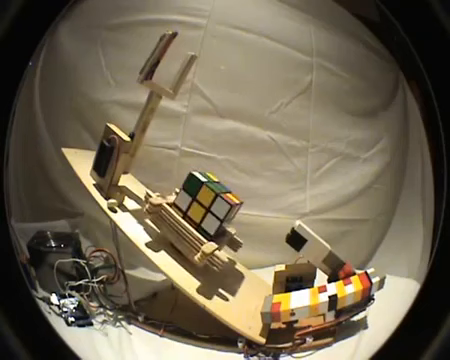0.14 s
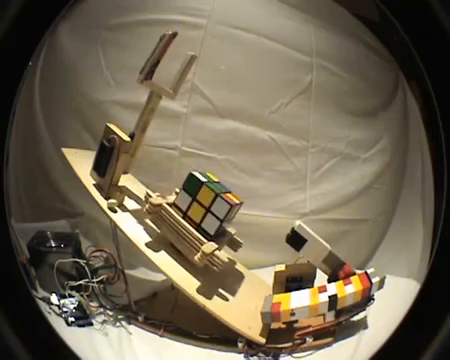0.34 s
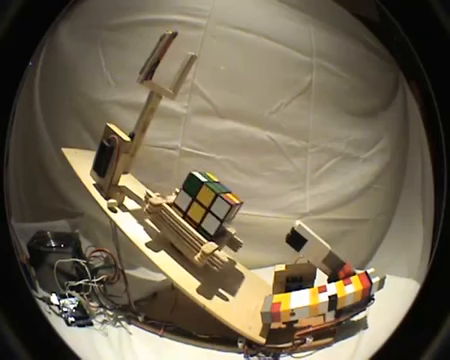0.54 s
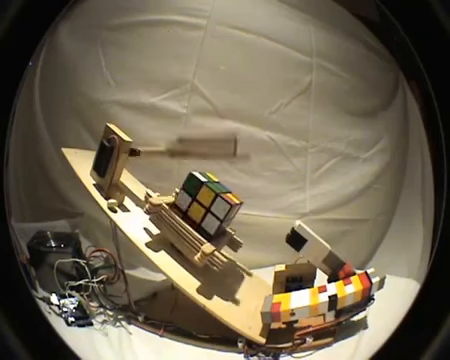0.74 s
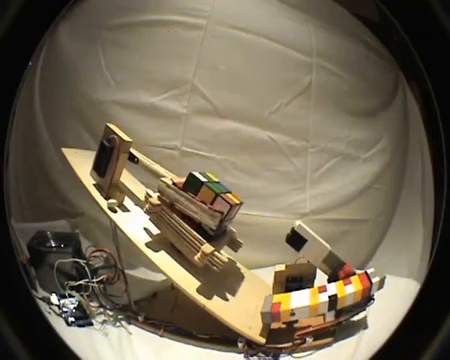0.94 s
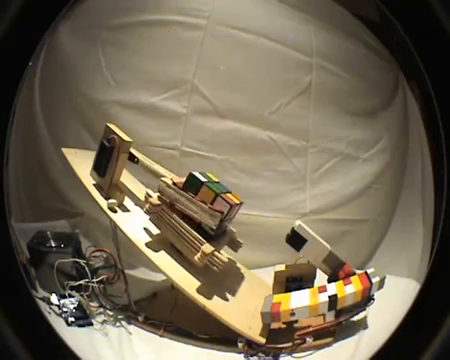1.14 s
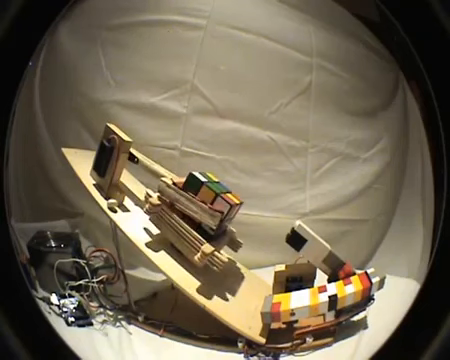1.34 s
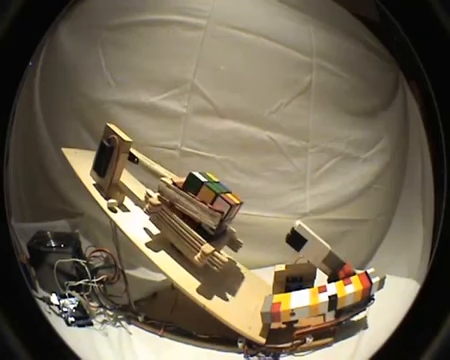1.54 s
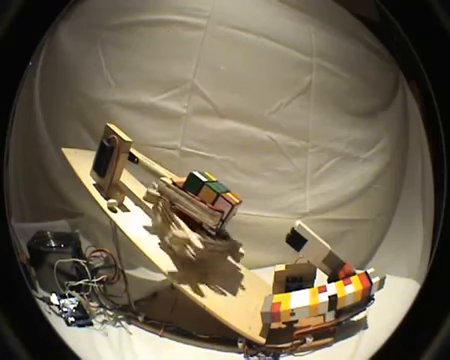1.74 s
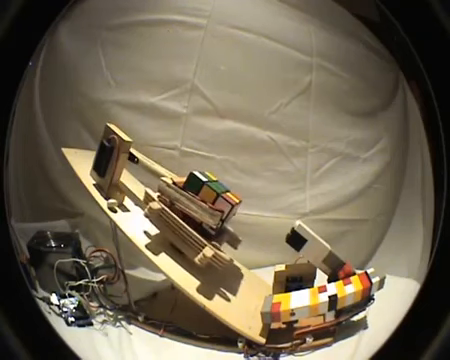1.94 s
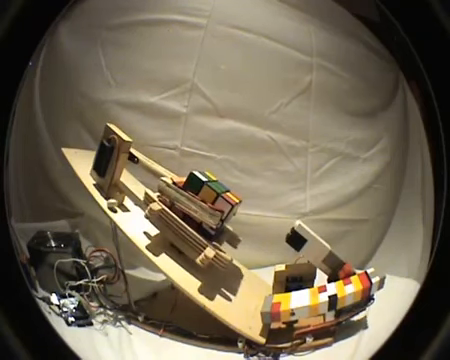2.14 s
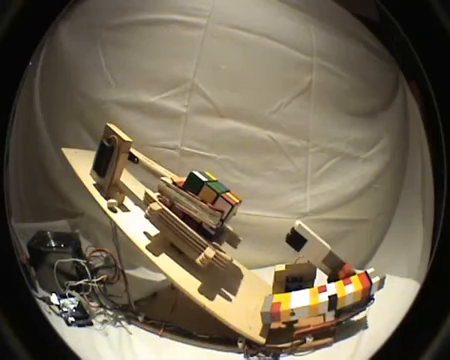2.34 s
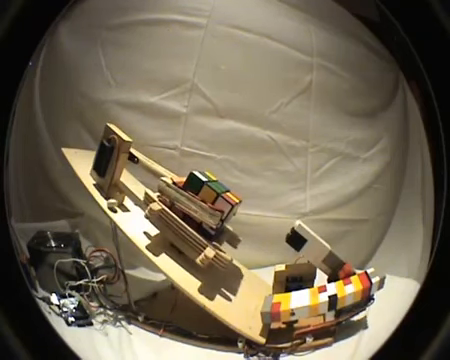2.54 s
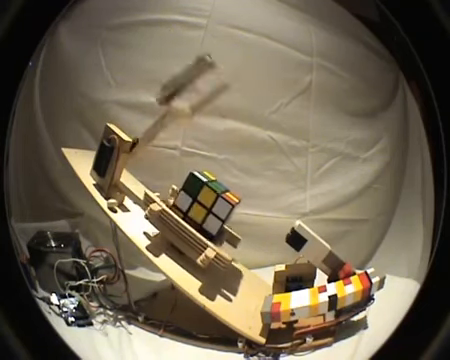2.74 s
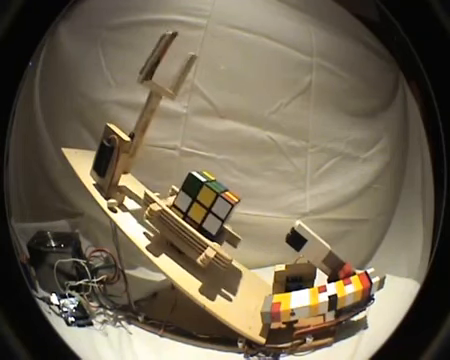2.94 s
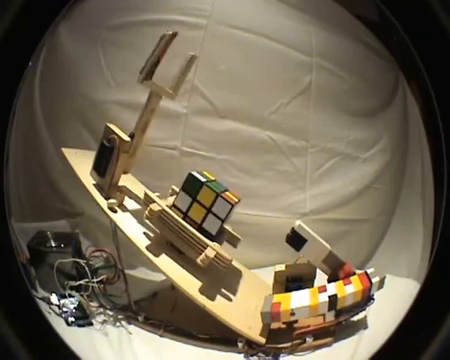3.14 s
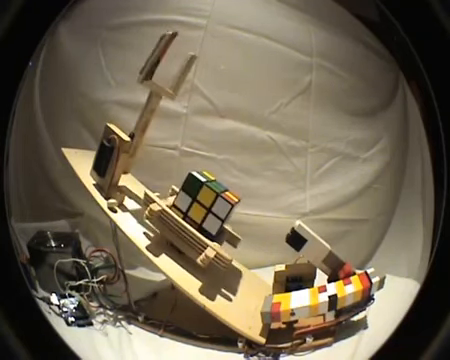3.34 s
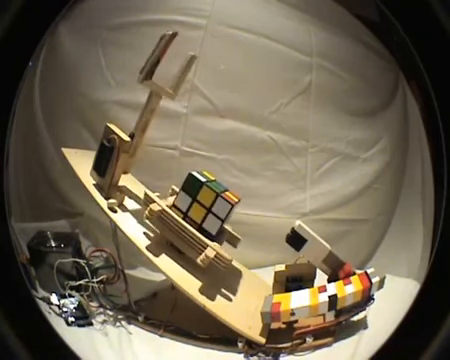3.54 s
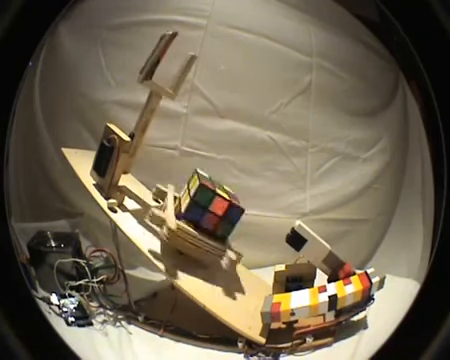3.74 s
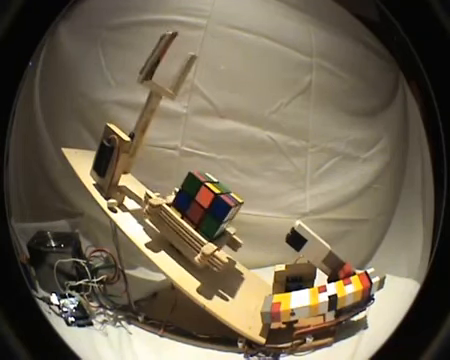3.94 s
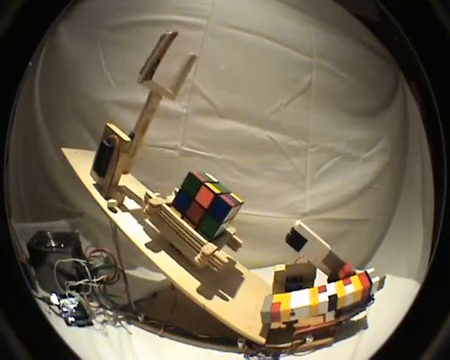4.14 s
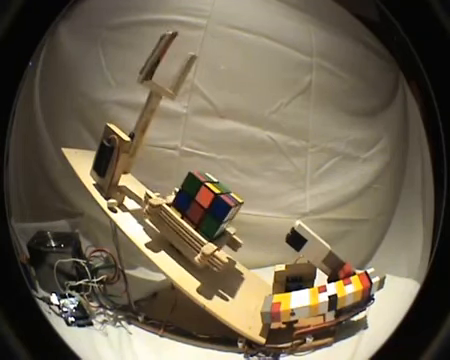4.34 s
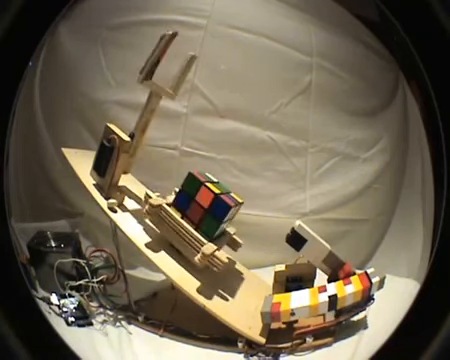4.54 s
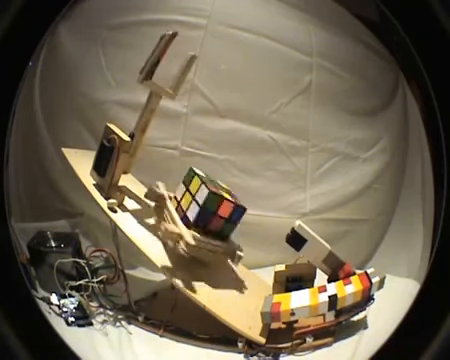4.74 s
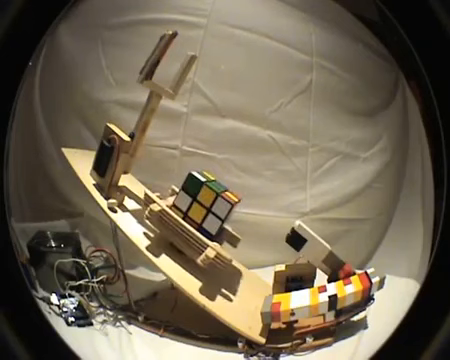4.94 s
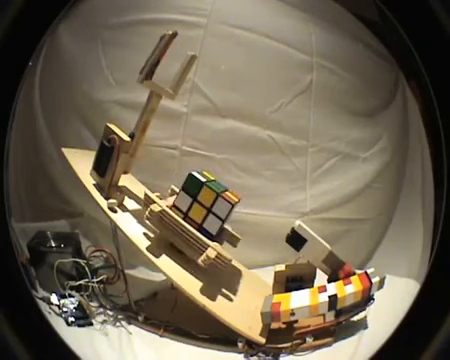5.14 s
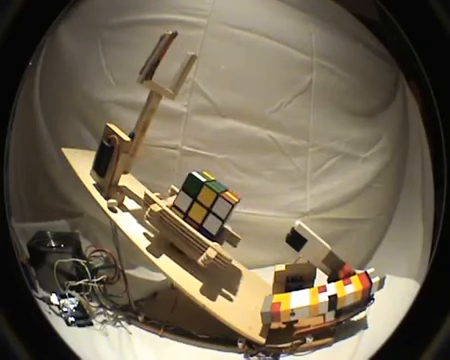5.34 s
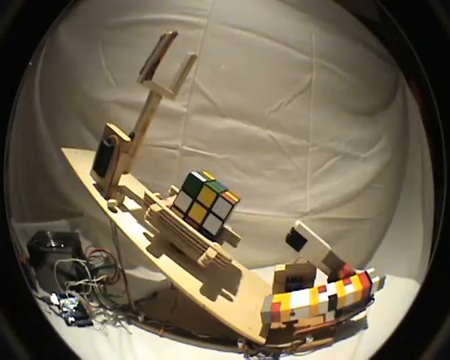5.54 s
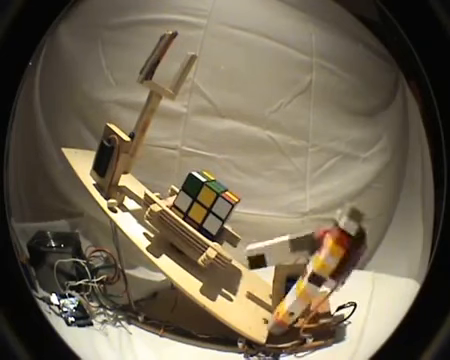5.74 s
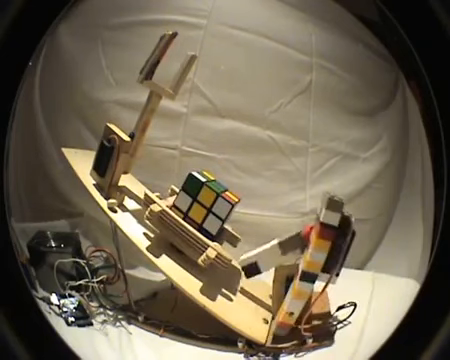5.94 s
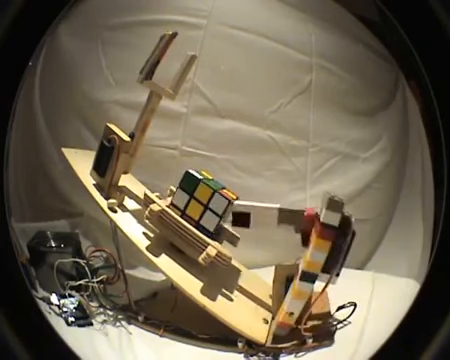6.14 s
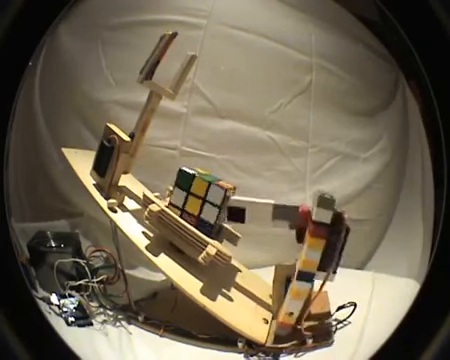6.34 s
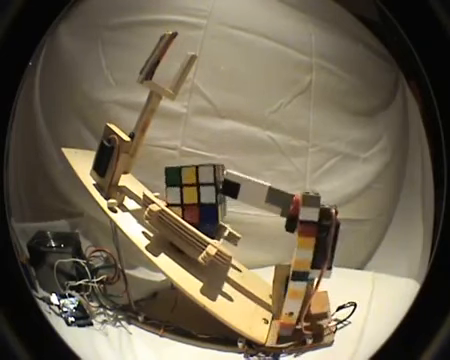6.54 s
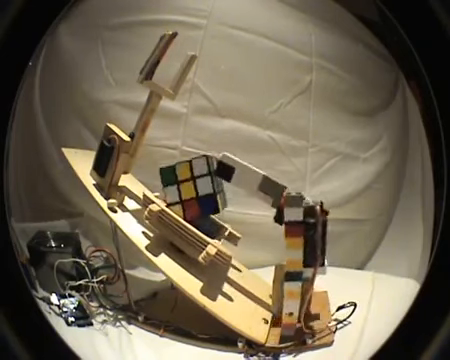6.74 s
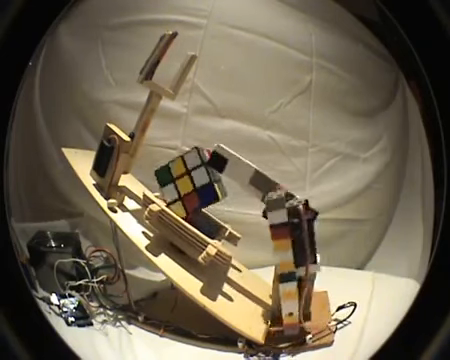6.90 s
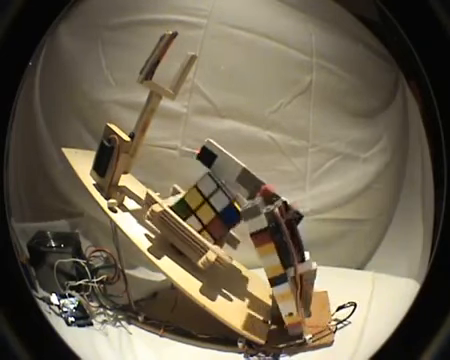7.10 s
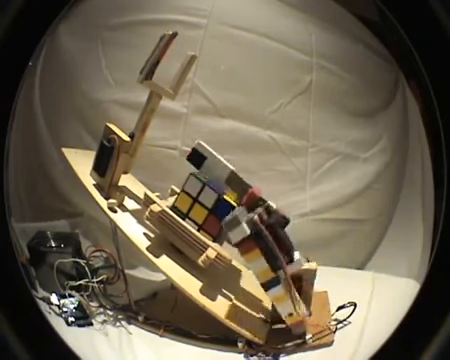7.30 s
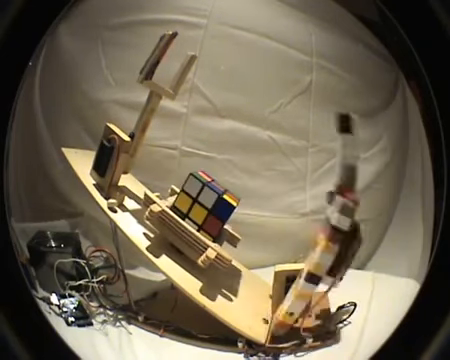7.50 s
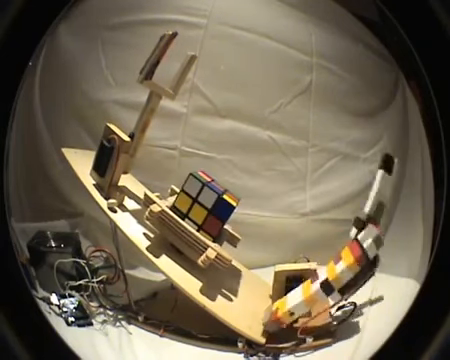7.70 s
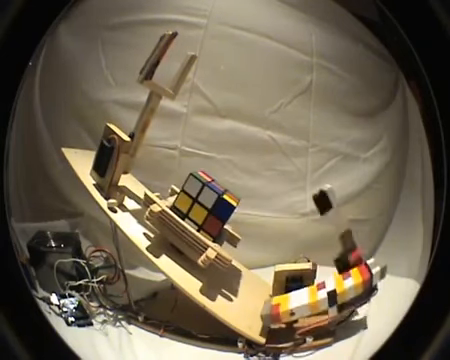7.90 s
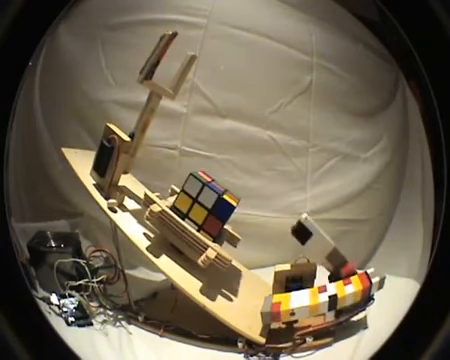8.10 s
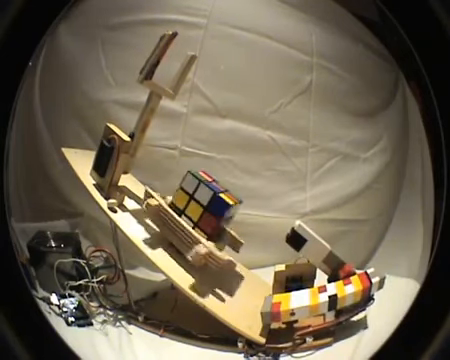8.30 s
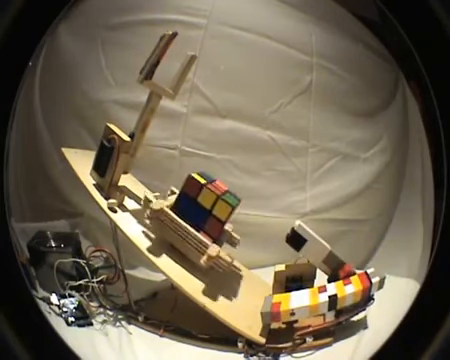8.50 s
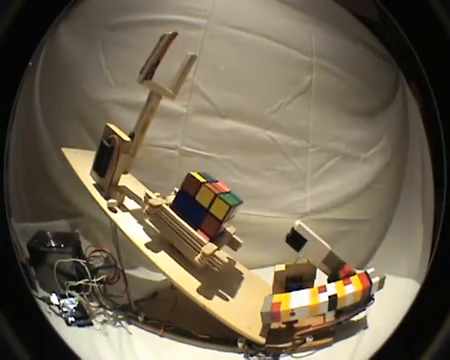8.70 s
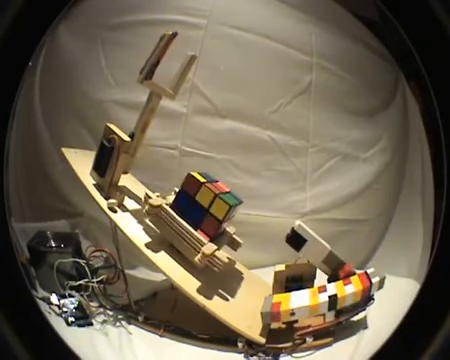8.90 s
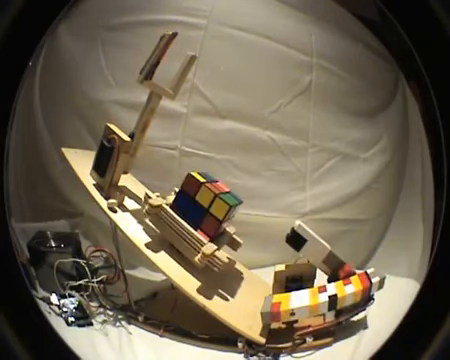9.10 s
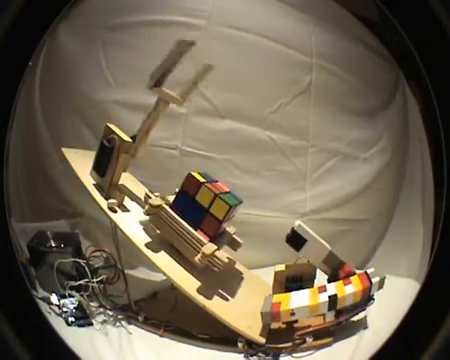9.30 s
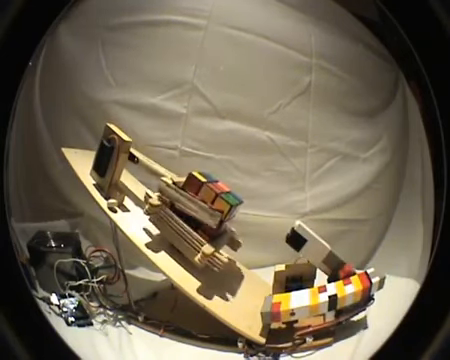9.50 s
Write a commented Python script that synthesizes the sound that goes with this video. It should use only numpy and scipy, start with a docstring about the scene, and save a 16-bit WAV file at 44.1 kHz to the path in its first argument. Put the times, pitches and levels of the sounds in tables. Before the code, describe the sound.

Small servo motors rattle and whir in short bursts, with a plastic cube knocking on wood over a soft fan hum.

```python
"""At a workbench with a cloth backdrop, two microphones face a home-made robot handling a puzzle cube.
Hobby servos swing a wooden fork, spin a turntable and drive a jointed arm: their gear teeth rattle
through the casings in short runs. The cube squeaks as it is twisted; tipped over by the arm, it scrapes
and knocks on its wooden cradle. The room is small-sounding and dry, with a steady fan hum behind it all."""
import sys
import numpy as np
from scipy import signal
from scipy.fft import rfft, irfft
from scipy.io import wavfile

SR = 44100
rng = np.random.default_rng(int(sys.argv[2]) if len(sys.argv) > 2 else 0)


def file_out(sig):
    """Save sig as 16-bit WAV at sys.argv[1]."""
    # one column per channel
    cols = np.atleast_2d(sig).T
    # limit, then scale
    lim = np.clip(cols, -1, 1)
    pcm = np.round(lim * 32767).astype(np.int16)
    wavfile.write(sys.argv[1], SR, pcm)


N = 426006
TIME = np.arange(N) / SR

SERVO_FRAME_HZ = 48.6   # control frames a second
BRAKE_KNEE_S, STOP_DB = .012, 42   # braking sets in gradually; the rotor stands still this far down
GROWL_SPEED, GROWL_RANGE = .85, .06   # shares of full speed

def gear_train(runs, mesh_hz, whine, rattle_db, flutter_db, throb_db,
               growl=.05, soft_db=-14, sag_db_per_s=0, spin_up_s=.07):
    """Force in a servo's gearbox: regular tooth contacts plus loose chatter, at an unsteady level."""
    drive, speed, effort = np.zeros((3, N))
    for start, rise, length, db, brake_db_per_s in runs:
        on = (TIME >= start) & (TIME <= start + length + STOP_DB / brake_db_per_s)
        t = TIME[on] - start
        # the rotor gathers speed, its load sags, then it slows as the drive eases off near its goal
        braked_s = BRAKE_KNEE_S * np.logaddexp(0, (t - length) / BRAKE_KNEE_S)
        effort[on] = from_db(-brake_db_per_s * braked_s)
        drive[on] += from_db(db - sag_db_per_s * t) * np.minimum(t / rise, 1) ** .89 * effort[on]
        speed[on] = (1 - .45 * np.exp(-t / spin_up_s)) * effort[on] ** .13
    live = drive > 0
    phase = 2 * np.pi * np.cumsum(mesh_hz * (speed * (1 + .011 * drift(150)))[live]) / SR
    # the first gear pair whines, louder with speed
    harmonics = enumerate([.8, .85, .4, .4, .5], start=1)
    mesh = sum(size * np.sin(k * phase) * (1 + .53 * drift(160)[live]) for k, size in harmonics)
    fast_pair = whine * speed[live] ** 3 * np.sqrt(effort[live]) * mesh
    # the next pair, four times slower, growls while it gets its load moving
    straining = np.exp(-((speed[live] - GROWL_SPEED) / GROWL_RANGE) ** 2)
    slow_pair = growl * np.sin(phase / 4) * (1 + .38 * drift(160)[live]) * straining
    chatter = grit(16000, rattle_db)[live] * (1 + .13 * np.cos(phase))   # strongest as a tooth engages
    frame_phase = 2 * np.pi * SERVO_FRAME_HZ * TIME[live]
    throb = .5 * np.cos(frame_phase) + np.cos(2 * frame_phase)
    surge = unit_rms(from_db(flutter_db * drift(110)[live] + throb_db * throb))
    force = np.zeros(N)
    force[live] = drive[live] * surge * (chatter + fast_pair + slow_pair)
    # coasting teeth touch softly, so the end of a run is duller
    hardness = np.clip(effort / from_db(soft_db), 0, 1)
    dull = signal.sosfilt(signal.butter(1, 3000, fs=SR, output="sos"), force)
    return hardness * force + (1 - hardness) * dull


# Servo moves. Each row: start, rise and driven time in seconds, level in dB, braking in dB per second.
TURNTABLE_RUNS = [(-.3, .02, 0.26, -23, 260), (1.698, 0.024, 0.26, -17.5, 290),
                  (3.696, 0.029, 0.25, -18, 300), (4.722, 0.032, 0.26, -18, 310),
                  (8.383, 0.019, 0.25, -18.5, 290)]
# The gearbox's tone. Each row: frequency in Hz, relative level in dB.
TURNTABLE_COLOUR = [(40, -11.5), (110, -10.5), (260, -7.5), (420, -8.5), (600, -11.5), (800, -5),
                    (1200, -8.5), (2000, -4.5), (3500, 0.5), (5200, 1.5), (6400, -4.5), (9200, -4.5),
                    (10300, -8.5), (15000, -17.5)]
# Casing resonances. Each row: centre and width in Hz, lift in dB.
TURNTABLE_MODES = [(519, 80, 6.8), (1683, 160, 8.1), (2500, 480, 7.4), (2760, 47, 3.5), (3560, 39, 3.5),
                   (4220, 250, 8), (5720, 300, 6.2), (6880, 210, 7.3), (7650, 390, 9.9), (8690, 400, 8.1),
                   (9150, 400, 4.3)]

def turntable():
    """The servo that spins the cradle sounds through the base board, just left of centre."""
    force = gear_train(TURNTABLE_RUNS, mesh_hz=2310, whine=.32, rattle_db=3.5, flutter_db=.95,
                       throb_db=0, growl=.4, soft_db=-.5, sag_db_per_s=2, spin_up_s=.05)
    return pan(body(force, TURNTABLE_COLOUR, TURNTABLE_MODES), left_db=1)


# The fork servo's moves, gearbox tone and casing resonances; rows as for the turntable.
FORK_RUNS = [(.693, 0.031, .135, -21, 170), (.85, 0.061, .085, -23.5, 299), (2.703, 0.051, 0.25, -19, 370),
             (9.385, .022, 0.19, -21, 518)]
FORK_COLOUR = [(40, -11), (150, -11.5), (600, -10.5), (1150, -10), (1500, -8.5), (2200, -5.5), (2800, 1),
               (5500, 0), (7000, -5.5), (9500, -7), (11000, -11.5), (15000, -20.5)]
FORK_MODES = [(1580, 200, 3.5), (3350, 640, 4.2), (4100, 270, 1.6), (8650, 1600, 7.2)]

def fork():
    """Gears rattle in the servo that lowers and lifts the wooden fork, just left of centre."""
    force = gear_train(FORK_RUNS, mesh_hz=1804, whine=.15, rattle_db=5, flutter_db=1.63,
                       throb_db=1.6, growl=.022, soft_db=-5, sag_db_per_s=12)
    return pan(body(force, FORK_COLOUR, FORK_MODES), left_db=1.3)


# The arm's moves, gearbox tones and casing resonances; rows as for the turntable.
SHOULDER_RUNS = [(5.707, 0.064, 0.17, -17, 270), (7.452, 0.094, 0.18, -17.5, 220),
                 (7.68, 0.063, .11, -34.5, 226)]
SHOULDER_COLOUR = [(40, -5), (150, -7), (500, -8.5), (1200, -6.5), (2000, -4), (3500, -1.5), (5000, 0),
                   (6500, 2), (8500, 2.5), (9400, -3), (11300, -2), (13000, -10.5), (15000, -11)]
SHOULDER_MODES = [(1940, 190, 2.2), (4070, 160, 3.4), (5780, 230, 5.4), (6950, 940, 8.6), (8070, 420, 6.6),
                  (10350, 485, 8.6)]
ELBOW_RUNS = [(6.072, 0.027, .115, -23.8, 400.4), (7.787, 0.048, .19, -20, 89.4),
              (8.1, 0.058, 0.23, -48.5, 250)]
ELBOW_COLOUR = [(40, -13), (120, -5.5), (300, -10.5), (550, -8.5), (1100, -10), (1700, -1.5), (3200, -5.5),
                (5500, 3.5), (7500, 0.5), (9500, -2), (11400, -7.5), (13000, -5), (15000, -18.5)]
ELBOW_MODES = [(2510, 520, 5.6), (3770, 170, 4.6), (6000, 350, 5.7), (6290, 210, 8.7)]
PUSH_RUNS = [(6.3, 0.17, 1.09, -38, 168)]   # the arm creeps forward under the weight of the cube
PUSH_COLOUR = [(50, -24.5), (100, 5), (350, -4), (520, -5), (900, -14), (1600, -1), (2470, -2), (3900, -6),
               (5200, -2), (6090, 6.5), (6900, -2.5), (10000, -12), (15000, -24)]
# Single motor kicks take up the gear slack. Each row: start in seconds, level in dB.
SLACK_KICKS = [(6.472, -27), (7.494, -15.5), (8.045, -25), (8.333, -25.5)]
KICK_DECAY_S, HUNT_START_S = .0056, 8.078
DRONE_AT_S, DRONE_WIDTH_S, DRONE_HZ = 7.95, .044, 251

def arm():
    """Just right of centre, two small bright servos reach out, push against the cube and fold back."""
    shoulder = gear_train(SHOULDER_RUNS, mesh_hz=2056, whine=.24, rattle_db=2.5, flutter_db=2.1,
                          throb_db=1.4, sag_db_per_s=3)
    elbow = gear_train(ELBOW_RUNS, mesh_hz=2145, whine=.19, rattle_db=6.5, flutter_db=.7,
                       throb_db=1.5, soft_db=-4, sag_db_per_s=7)
    push = gear_train(PUSH_RUNS, mesh_hz=1233, whine=.02, rattle_db=10, flutter_db=2.5,
                      throb_db=2, soft_db=-21)
    # the folded arm hunts for its rest position, with a weaker kick on every second control frame
    hunting = [(HUNT_START_S + 2 * k / SERVO_FRAME_HZ, -18 - 2.5 * k) for k in range(6)]
    kick_rows = [(s, db, KICK_DECAY_S) for s, db in SLACK_KICKS + hunting]
    kicks = bursts(kick_rows, rise_s=.0014) * grit(16000, 3.6)
    joints = body(elbow + kicks, ELBOW_COLOUR, ELBOW_MODES) + body(push, PUSH_COLOUR)
    # the arm's frame drones as it folds back
    swell = from_db(-37.5) * np.exp(-((TIME - DRONE_AT_S) / DRONE_WIDTH_S) ** 2)
    drone = swell * np.sin(2 * np.pi * DRONE_HZ * TIME + .45 * drift(60))
    upper_arm = body(shoulder, SHOULDER_COLOUR, SHOULDER_MODES)
    return pan(upper_arm, left_db=-.4) + pan(joints + drone, left_db=-.9)


# Cube and arm strike the cradle.
# Each row: start in seconds, snap level in dB, snap pitch in Hz, scrape and thud levels in dB.
KNOCKS = [(6.18, -34, 1490, -24.5, -26.5), (6.414, -47, 1700, -53, -33.5), (6.551, -37, 1620, -34, -37),
          (6.651, -39, 2500, -37.5, -42), (6.734, -34.5, 2400, -37, -36.5),
          (6.787, -38, 1610, -31.5, -31.5), (6.821, -34, 2490, -34, -29.5),
          (7.072, -22.5, 990, -25.5, -29.5), (7.161, -35, 5500, -25.5, -30), (7.186, -17, 3400, -23, -27.5),
          (7.225, -10.5, 7840, -23.5, -31), (7.295, -31.5, 6200, -28.5, -35.5),
          (7.309, -39, 2470, -28, -27.5), (7.336, -30, 500, -44, -27.5), (7.394, -30, 2330, -27, -28.5),
          (8.325, -39, 500, -49, -31)]
# The cradle's wood rings. Each row: pitch in Hz, relative level in dB, seconds to fall 60 dB.
CRADLE_MODES = [(82, -5, 0.13), (131.3, -2.5, 0.11), (193, -2, 0.084), (278, -4, 0.096), (386, -1, 0.077),
                (451, -4, 0.079), (531, -1.5, 0.11), (925, -15, .04)]
# The cube wobbles in the cradle after a run. Each row: start in seconds, level in dB, decay in seconds.
WOBBLES = [(.033, -34.5, 0.01), (.062, -34, 0.0055), (.078, -48, .005), (.125, -41, 0.0049),
           (1.016, -31.5, 0.0045), (1.056, -43.5, .006), (2.033, -33.5, 0.012), (2.078, -35, .01),
           (2.097, -32.5, 0.015), (2.136, -32, 0.016), (4.04, -35, .008), (5.1, -32, .005),
           (8.701, -30.5, .006), (9.631, -36.5, .005)]
# The tone of the snaps and the wobbles. Each row: frequency in Hz, relative level in dB.
SNAP_COLOUR = [(100, -20), (600, -1), (1200, -2), (2700, -1), (4300, -2.5), (5700, 3.5), (8500, -5),
               (11000, -9), (15000, -17)]
WOBBLE_COLOUR = [(200, 1.5), (1500, 3.5), (2000, 2.5), (2400, 8), (3000, -2.5), (5800, -2.5), (9000, -15.5),
                 (15000, -33)]
# The hollow plastic's resonances, struck and wobbling. Each row: centre and width in Hz, lift in dB.
CUBE_MODES = [(2500, 320, 8.5), (4900, 330, 3), (8000, 400, 4), (10360, 400, 9)]
WOBBLE_MODES = [(2430, 260, 3.5)]
SCRAPE_S, SHOVE_S = .027, .014   # every knock slides on for a moment and leans on the wood

def cube():
    """Between the microphones, plastic snaps and scrapes on the cradle, whose wood answers with a thud."""
    snaps = sum(snap(s, db, hz) for s, db, hz, *_ in KNOCKS)
    slips = grit(9000, 3.6) * from_db(2.16 * drift(200) - 2)   # a scrape catches and lets go
    scrapes = bursts([(s, db, SCRAPE_S) for s, _, _, db, _ in KNOCKS], shape=1.52, rise_s=.001) * slips
    shoves = bursts([(s, db, SHOVE_S) for s, *_, db in KNOCKS])
    thuds = sum(ring(shoves * grit(3000, .79), hz, t60) * from_db(db - 27.5)
                for hz, db, t60 in CRADLE_MODES)
    rocking = bursts(WOBBLES, rise_s=.002) * grit(6000, 7.5)
    wobbles = body(rocking, WOBBLE_COLOUR, WOBBLE_MODES)
    return pan(body(snaps + scrapes, SNAP_COLOUR, CUBE_MODES) + thuds + wobbles, left_db=.5)


def snap(start, db, hz, ring_cycles=22, crack_s=.0012):
    """A brief crack sets the struck corner ringing."""
    t = TIME[:SR // 20]
    crack = rng.standard_normal(len(t)) * np.exp(-t / crack_s)
    corner = ring(crack, hz, ring_cycles / hz) * np.sqrt(hz / 1000)
    out = np.zeros(N)
    out[int(start * SR):][:len(t)] = from_db(db) * (.73 * crack + from_db(-16) * corner)
    return out


# The course of one squeak. Each row: time in seconds, pitch in Hz, level in dB.
SQUEAK_PATH = [(1.76, 4080, -35.5), (1.785, 4200, -20), (1.819, 4380, -18), (1.83, 4380, -35),
               (1.841, 4370, -20.5), (1.889, 4230, -16), (1.9, 4200, -41)]

def squeak():
    """Twisted against the fork, the cube's layers stick and slip, louder in the left microphone."""
    s, hz, db = np.transpose(SQUEAK_PATH)
    pitch = np.interp(TIME, s, hz) * (1 + .0146 * drift(400))
    level = from_db(np.interp(TIME, s, db) + 4.8 * drift(160)) * (TIME > s[0]) * (TIME < s[-1])
    return pan(level * np.sin(2 * np.pi * np.cumsum(pitch) / SR), left_db=5)


# A resting servo's spells of sizzling and its gearbox tone; rows as for the turntable.
HOLD_RUNS = [(4.3, 0.16, 0.57, -63.5, 300), (5.05, .05, .05, -65, 40), (8.9, 0.11, .48, -57, 300)]
HOLD_COLOUR = [(300, -24), (1400, -7.5), (2000, 4), (3000, -11.5), (4500, -1.5), (6200, -5), (7500, -16.5),
               (15000, -19)]

def resting_servo():
    """Faint and off to the left, a resting motor trembles against its gears."""
    force = gear_train(HOLD_RUNS, mesh_hz=1960, whine=.05, rattle_db=2.5, flutter_db=1, throb_db=-1)
    return pan(body(force, HOLD_COLOUR), left_db=4)


# The fan's rush of air. Each row: frequency in Hz, relative level in dB.
AIR_COLOUR = [(20, -9.5), (45, -11), (65, -13.5), (100, -14), (170, -8.5), (240, -8.5), (480, -9),
              (720, -4), (1000, -11.5), (2000, -21.5), (4000, -30), (8000, -34), (15000, -35)]
# Fan and motor hum. Each row: pitch in Hz, level in dB.
HUM_LINES = [(91.5, -67), (150, -71), (171, -62.5), (194.5, -62), (292, -67.5), (340, -72), (441, -68.5),
             (489, -66.5), (682, -57.5), (727, -64.5), (852, -68)]

def fan():
    """In the background, soft rushing air and slightly wavering hum; the middle range is most diffuse."""
    mid, side = (body(rng.standard_normal(N), AIR_COLOUR) for _ in range(2))
    side = from_db(-8) * side + bandpass(side, 300, 3000)
    air = from_db(-51.5) * (mid + from_db(-6) * side * [[1], [-1]])
    hum = np.zeros(N)
    for hz, db in HUM_LINES:
        phase = 2 * np.pi * hz * TIME + hz / 900 * drift(7)
        hum += from_db(db) * np.sqrt(2) * np.sin(phase) * (1 + .25 * drift(7.7))
    return pan(air + hum, left_db=.95)


def room(x, wet_db, early_db, t60_s):
    """Quick reflections off the bench reach both microphones alike; each gets its own diffuse tail."""
    t = TIME[:SR // 3]
    early = rng.standard_normal(len(t)) * np.exp(-t / .0083) * (t > .001)
    tails = rng.standard_normal((2, len(t))) * from_db(-60 * t / t60_s) * (t > .002)
    tails /= np.linalg.norm(tails, axis=1, keepdims=True)
    tails = bandpass(tails, 150, 5500)   # cloth soaks up the treble
    response = from_db(wet_db) * tails + from_db(early_db) * early / np.linalg.norm(early)
    return x + signal.oaconvolve(x, response, axes=1)[:, :N]


def body(x, colour, modes=(), size=4096):
    """Causal filter of unit power: a broad colour lifted by resonances."""
    hz = np.arange(size // 2 + 1) * SR / size + 1
    colour_hz, colour_db = np.transpose(colour)
    db = np.interp(np.log(hz), np.log(colour_hz), colour_db)
    for centre, width, lift in modes:
        db += lift / (1 + (2 * (hz - centre) / width) ** 2)
    cepstrum = irfft(np.log(from_db(db)))
    cepstrum[1:size // 2] *= 2   # fold onto positive time for minimum phase
    cepstrum[size // 2 + 1:] = 0
    response = irfft(np.exp(rfft(cepstrum)))
    return signal.oaconvolve(x, response / np.linalg.norm(response))[:N]


def ring(x, hz, t60):
    """One resonance: a unit click sets a sine of height 1 ringing."""
    radius, angle = from_db(-60 / (t60 * SR)), 2 * np.pi * hz / SR
    return signal.lfilter([0, np.sin(angle)], [1, -2 * radius * np.cos(angle), radius ** 2], x + 1e-18)


def bursts(rows, shape=1, rise_s=.00028):
    """Envelope of contacts that start quickly and die away."""
    out = np.zeros(N)
    for start, db, decay_s in rows:
        part = out[int(start * SR):][:SR // 4]
        t = TIME[:len(part)]
        part += from_db(db) * np.minimum(t / rise_s, 1) * np.exp(-(t / decay_s) ** shape)
    return out


def grit(per_s, spread_db):
    """Random tiny impacts of uneven size; rms 1."""
    sizes = rng.choice([-1, 1], N) * from_db(spread_db * np.clip(rng.standard_normal(N), -2, 2))
    return unit_rms(sizes * (rng.random(N) < per_s / SR))


def drift(rate):
    """A random wander through `rate` points a second; rms 1."""
    knots = rng.standard_normal(int(N / SR * rate) + 2)
    return unit_rms(np.interp(TIME * rate, np.arange(len(knots)), knots))


def pan(x, left_db):
    """Place a source between the two microphones."""
    return x * from_db([[left_db / 2], [-left_db / 2]])


def bandpass(x, low_hz, high_hz):
    """Gently roll off bass and treble."""
    return signal.sosfilt(signal.butter(1, [low_hz, high_hz], "band", fs=SR, output="sos"), x)


def from_db(db):
    """Decibels to gain."""
    return 10 ** (np.asarray(db) / 20)


def unit_rms(x):
    """Scale to rms 1."""
    return x / np.sqrt(np.mean(x ** 2) + 1e-20)


def scene():
    """The robot on its bench, with the fan behind it."""
    robot = fork() + turntable() + squeak() + arm() + resting_servo() + cube()
    return from_db(-1.5) * room(robot, wet_db=-6.5, early_db=-19, t60_s=.15) + fan()


def record(dry, cutoff_hz=15200):
    """Both channels lose their top treble to a steep low-pass."""
    return signal.sosfilt(signal.ellip(10, .1, 80, cutoff_hz, fs=SR, output="sos"), dry)


dry = scene()
out = record(dry)
file_out(out)
```